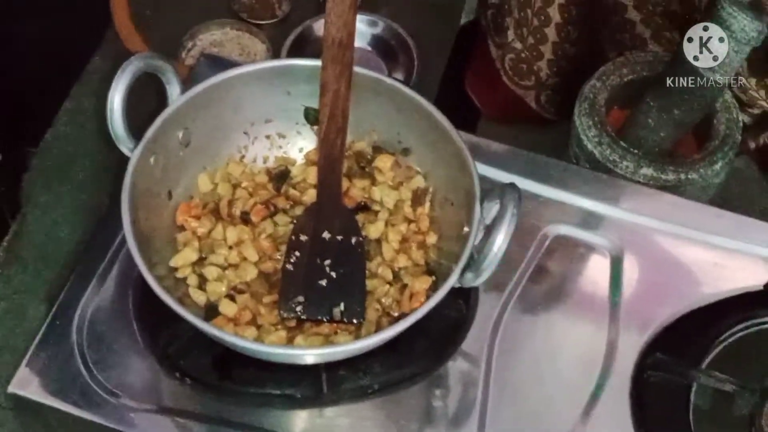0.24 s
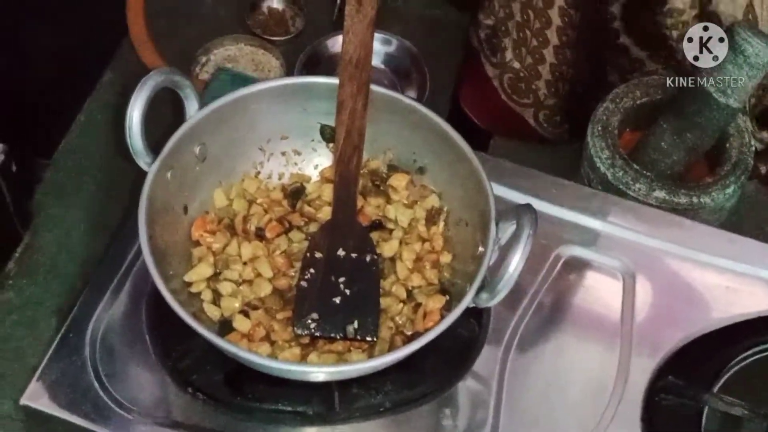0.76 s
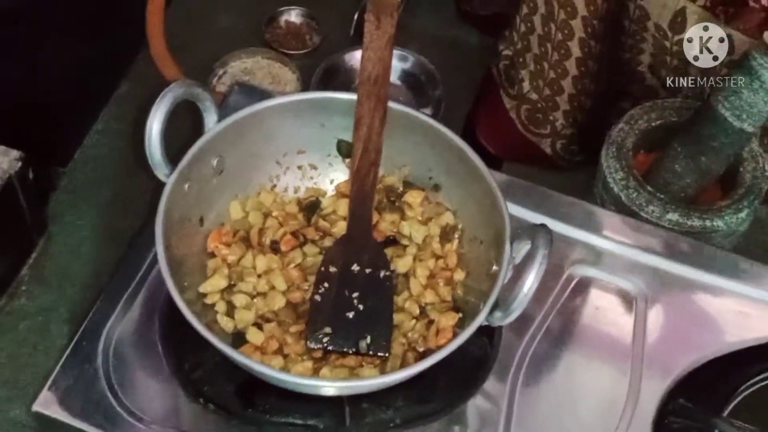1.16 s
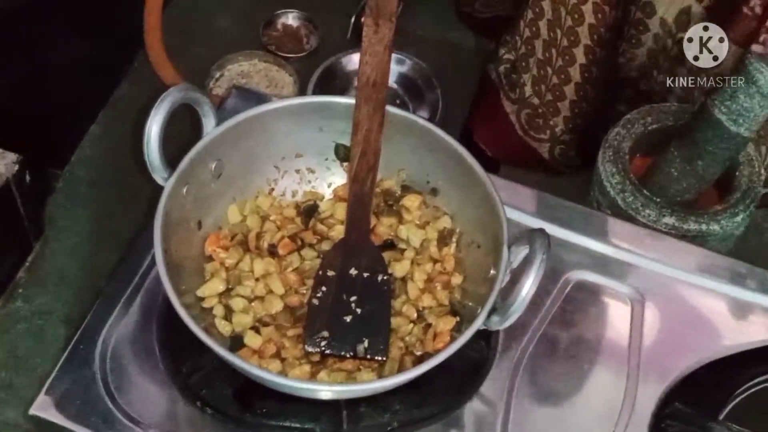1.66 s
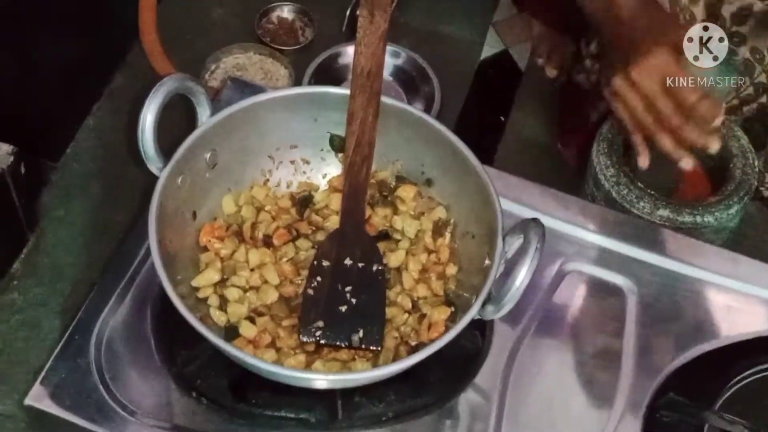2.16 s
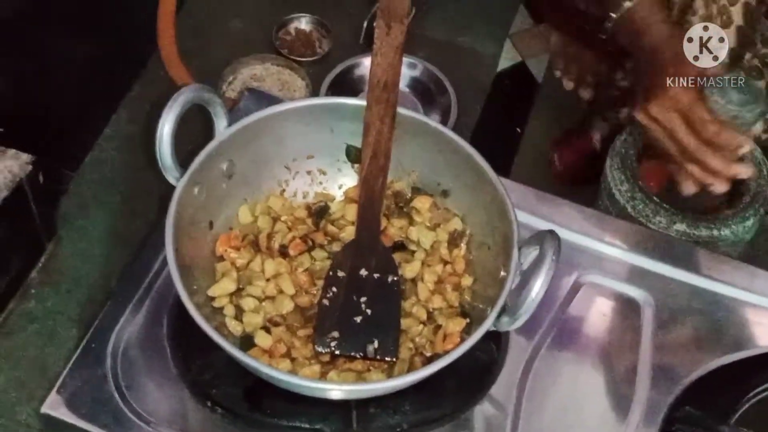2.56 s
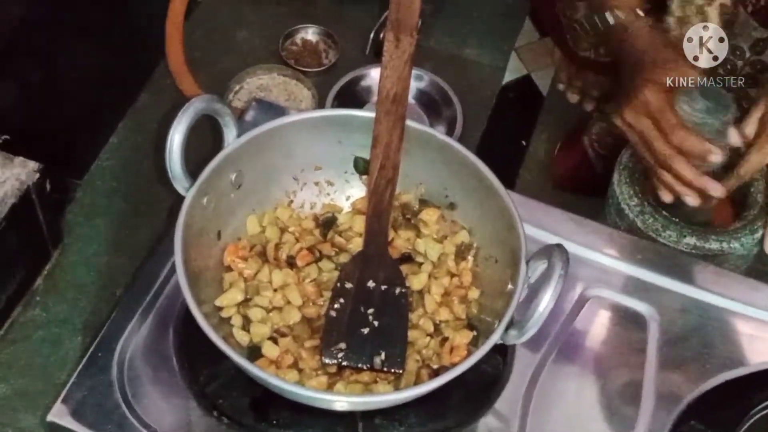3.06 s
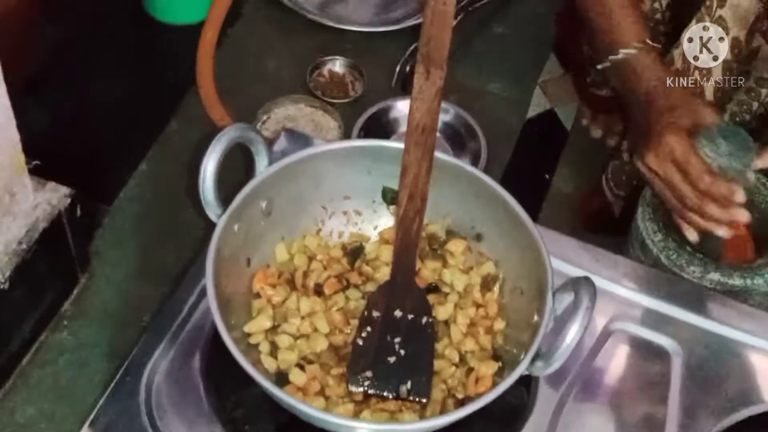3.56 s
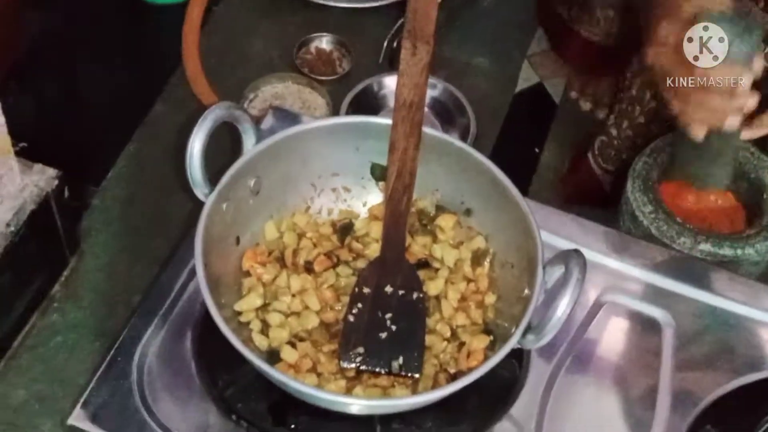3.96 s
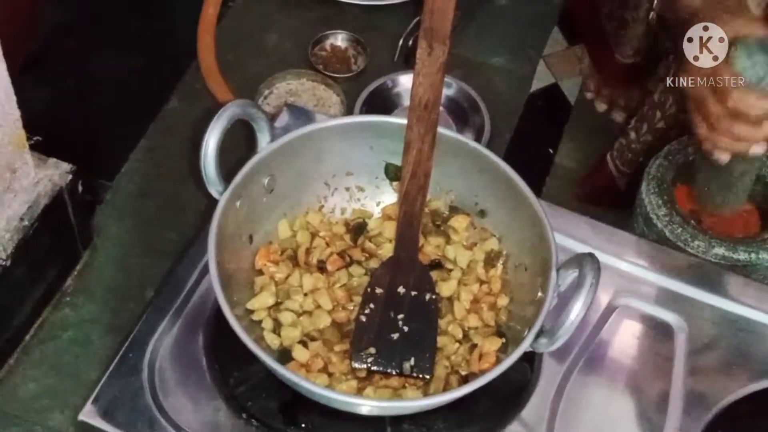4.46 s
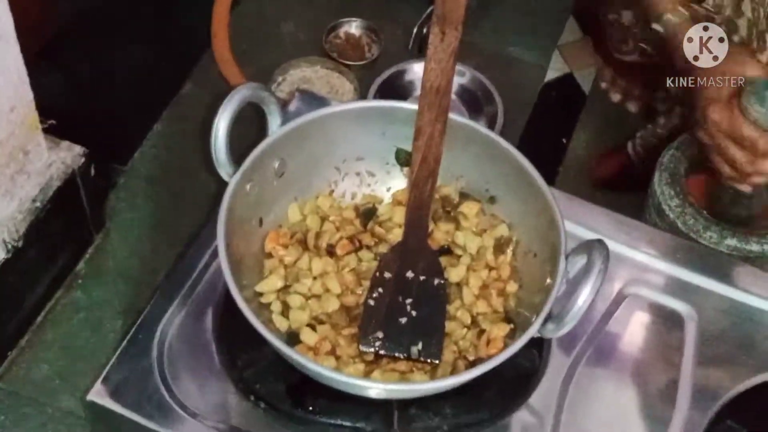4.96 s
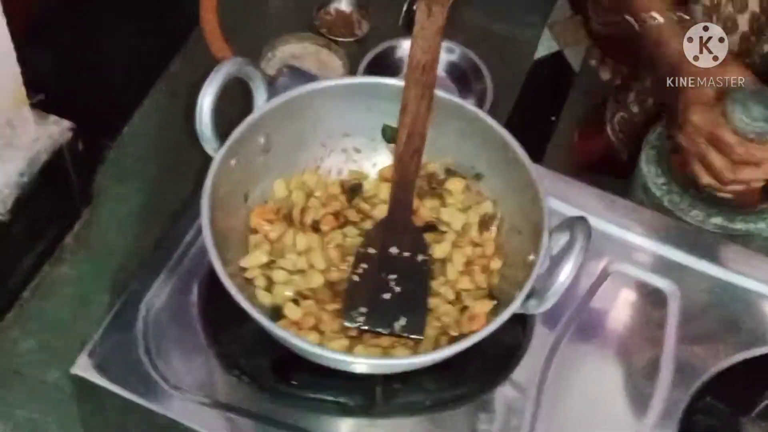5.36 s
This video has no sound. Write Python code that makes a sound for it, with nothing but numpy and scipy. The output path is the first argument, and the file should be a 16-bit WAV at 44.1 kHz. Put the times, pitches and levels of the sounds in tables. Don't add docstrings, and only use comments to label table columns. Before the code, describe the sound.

In a small hard kitchen, a stone pestle pounds in a stone mortar a little away from the microphone. A small knock and a hollow bowl tap come first, then double and triple blows, one very loud strike, and another firm cluster. A nearby pan sizzles softly over low rumble and mains hum; the background dips briefly after the hardest blow.

```python
import sys
import numpy as np
from scipy import signal
from scipy.fft import rfft, irfft, next_fast_len
from scipy.io import wavfile

SR = 44100
rng = np.random.default_rng(int(sys.argv[2]) if len(sys.argv) > 2 else 0)


def natural_amplitude(level_db):
    exponent = np.asarray(level_db, float) / 20
    return 10 ** exponent


def store_wav(level_fs):
    pcm = np.round(np.clip(np.atleast_2d(level_fs), -1, 1) * 32767)
    wavfile.write(sys.argv[1], SR, pcm.T.astype(np.int16))


N = 247652
SIZE = next_fast_len(N + SR)


def pestle():
    # t/s, thud/dB under 450 Hz, body/dB, clack/dB over 1400 Hz, echoes/dB
    blows = [(.103, -24.5, -32.5, -31, -31), (0.125, -42, -36, -72, -30), (.856, -58, -66, -40.5, -26),
             (1.138, -33, -27.5, -32, -22.5), (1.256, -46, -35.5, -44, -22), (1.867, -56, -40, -45, -24.5),
             (2.032, -25.5, -16, -14, -29.5), (2.0491, -22.5, -19, -15.5, -32.5),
             (2.336, -31, -16, -27, -24), (2.342, -25.5, -20.5, -23, -19.5), (2.35, -21, -17.5, -41, -24.5),
             (2.641, -43.5, -43, -38.5, -30), (2.904, -26.5, -22, -33.5, -26.5),
             (2.915, -31, -20.5, -31.5, -25.5), (3.968, -44.5, -64, -64, -27), (4.0664, 1, 2, -3, -29),
             (4.309, -52, -39, -47, -17.5), (4.426, -16.5, -11.5, -4.5, -29.5),
             (4.437, -29, -10.5, -42, -32.5), (4.488, -15.5, -9.5, -27, -29.5),
             (4.729, -25, -18.5, -29, -29), (4.905, -38, -54, -38, -21.5), (5.205, -49, -59, -32.5, -36.5),
             (5.499, -40, -28, -42, -22.5)]
    # f/Hz, level/dB, t60/s
    counter_modes = [(283, 14, 0.1), (397, -23, 0.27), (470.3, 4.5, 0.13), (567, -11, 0.11),
                     (650.3, 1.5, 0.34), (717.6, -3.5, 0.12), (837.5, 3.5, 0.12), (1045, -2, 0.75),
                     (1080, -11.5, 0.9), (1460, -3, 0.32), (1640, -4, 0.43)]
    s, thud_db, body_db, clack_db, echo_db = np.transpose(blows)
    cushion_db = 0.29 * np.clip(body_db + 45, -60, 25.0)
    click_db = clack_db - 14 - cushion_db
    shares_db = np.array([thud_db, body_db, clack_db, click_db])
    sent_db = shares_db + echo_db
    echoes = sum(room(contact(s[spot::3], sent_db[:, spot::3])) for spot in range(3))
    ringing = 0
    for hz, level_db, t60 in counter_modes:
        column = np.searchsorted([450, 1400], hz)
        luck_db = 2.7 * rng.standard_normal(len(s))
        train = clicks(s + .002, sent_db[column] + level_db + 12 + luck_db)
        ringing = ringing + ring(train, hz, min(t60, .33))
    return contact(s, shares_db) + echoes + soft(ringing)


def contact(seconds, shares_db):
    # f/Hz, t60/s
    contact_modes = [
        [(280, 0.022), (430, 0.014)],
        [(640, 0.011), (920, .014), (1300, 0.0042)],
        [(1680, 0.0042), (2350, 0.006)],
        [(2850, 0.011), (3250, 0.0048)],
    ]
    # lower edge/Hz, upper edge/Hz
    share_bands = [
        (215, 1770),
        (400, 3006),
        (900, 2710),
        (1900, 3800),
    ]
    out = 0
    for share_db, modes, (low_hz, top_hz) in zip(shares_db, contact_modes, share_bands):
        train = clicks(seconds, share_db + 3.0)
        pulse = sum((-1) ** k * ring(train, hz, t60) for k, (hz, t60) in enumerate(modes))
        pulse = signal.sosfilt(signal.butter(2, low_hz, "high", fs=SR, output="sos"), pulse)
        out = out + signal.sosfilt(signal.cheby1(5, 1, top_hz, fs=SR, output="sos"), pulse)
    return out


def mortar_rocking():
    # t/s, level/dB
    thumps = [
        (.104, -34.5),
        (.128, -39),
        (2.47, -45),
        (4.93, -45.5),
    ]
    # f/Hz, level/dB, t60/s
    base_modes = [(201, -1, 0.14), (370, -6.5, 0.095)]
    return soft(struck(thumps, base_modes))


def bowl():
    # t/s, level/dB
    bowl_taps = [
        (1.137, -25.5),
        (1.253, -38.5),
    ]
    # f/Hz, level/dB, t60/s
    bowl_modes = [(585, 8, .06), (562, -9, .3), (597, -5, .35), (646, -11, .3), (705, -7, .12),
                  (775, -12, .2), (1380, -11, .15), (1450, -12, .15), (115, -14, .25)]
    direct = soft(struck(bowl_taps, bowl_modes))
    return direct + natural_amplitude(-31) * room(direct)


def dish():
    # t/s, level/dB
    pings = [
        (2.914, -55),
        (4.078, -59.5),
        (4.43, -72),
        (4.74, -61),
        (4.78, -54),
    ]
    # f/Hz, level/dB, t60/s
    dish_modes = [(5750, 0.5, 0.24), (7040, -8, 0.18)]
    return struck(pings, dish_modes)


def boom():
    # t/s, level/dB
    floor_blows = [
        (1.139, -65),
        (2.337, -56),
        (4.07, -46),
        (4.489, -46.5),
        (4.75, -65),
    ]
    train = clicks(*np.transpose(floor_blows))
    return ring(train, 67.1, 0.78) - ring(train, 72.36, 1.0)


def spits():
    # t/s, level/dB, f/Hz
    fat_spits = [
        (1.2, -34, 14000),
        (5.206, -34, 4600),
        (5.209, -45, 2500),
    ]
    return sum(ring(clicks([at], [db]), hz, 0.0032) for at, db, hz in fat_spits)


def frying():
    # t/s, level/dB
    heat = [(0, -55), (.07, -56.5), (.25, -49.5), (.3, -57), (1.05, -56.5), (1.2, -53), (1.3, -56),
            (2.0, -56.5), (2.04, -53), (2.3, -57), (2.34, -54), (2.5, -55), (3.3, -57), (4.3, -55),
            (4.84, -52.5), (5.0, -58), (5.24, -53.5), (5.62, -54)]
    # f/Hz, density/dB per Hz
    sizzle_spectrum = [(1940, -67), (3300, -5.5), (3680, -9), (4010, -6.5), (4420, -9.5), (5300, -6.5),
                       (5910, -14), (6600, -19), (8440, 0.5), (9730, -8), (11200, -16), (12100, -22.5),
                       (13900, -12), (14900, -6), (15500, -25)]
    murmur_spectrum = [(410, -27), (700, -29), (715, -12.5), (1160, -0.5), (1530, 1), (2300, 3.5),
                       (2780, 0), (2990, -4.5), (4000, -19), (5200, -76), (8800, -120)]
    sizzle_db = np.interp(np.arange(N) / SR, *np.transpose(heat))
    murmur_db = -53 + 0.79 * (sizzle_db - sizzle_db.mean())
    murmur = natural_amplitude(murmur_db) * coloured(murmur_spectrum, patchy_db=1.44, grain_db=4.0, count=10)
    sizzle = natural_amplitude(sizzle_db) * coloured(sizzle_spectrum, patchy_db=2.0, grain_db=5.0, count=14)
    return murmur + sizzle


def rumble():
    # f/Hz, density/dB per Hz
    rumble_spectrum = [(15, -74), (25, -23), (59, -11.5), (134, -3.5), (172, -6.5), (189, 0), (220, -7.5),
                       (245, -5), (455, -7), (477, -10), (565, -6.5), (712, -8), (1000, -16.5), (1300, -34),
                       (2200, -120)]
    # t/s, level/dB above the rumble, rise and fall/s
    swells = [
        (0, 2.5, 0.25),
        (1.9, 0.5, .4),
        (2.7, 3, 0.57),
        (3.45, 6, 0.14),
        (4.3, 9.5, 0.48),
        (5.1, 4, 0.28),
        (5.62, 8.5, 0.24),
    ]
    t = np.arange(N) / SR
    swell_db = sum(db * np.clip(1 - abs(t - at) / span, 0, 1) for at, db, span in swells)
    return natural_amplitude(-59 + swell_db) * coloured(rumble_spectrum, patchy_db=1.5, grain_db=2.5)


def hum():
    # f/Hz, level/dB rms
    harmonics = [(199.2, -64.5), (248.5, -64.5), (291, -74.5)]
    t = np.arange(N) / SR
    return sum(np.sqrt(2) * natural_amplitude(db + 0.73 * drift(1.2)) * np.sin(2 * np.pi * hz * t) for hz, db in harmonics)


def room(x):
    # f/Hz, t60/s
    decay_times = [(100, 1), (260, 0.48), (700, 0.41), (1840, 0.47)]
    # f/Hz, level/dB
    echo_colour = [(100, -10), (200, -3), (400, 0), (3000, 0), (5000, -6)]
    t, tail = np.arange(SR) / SR, 0
    white = rng.standard_normal((2, SR))
    for k, hz in enumerate(100 * 2 ** np.arange(0, 6, .5)):
        sos = signal.butter(2, [hz / 2 ** .25, hz * 2 ** .25], "band", fs=SR, output="sos")
        decay_db = at_hz(echo_colour, hz) - 60 * t / at_hz(decay_times, hz)
        tail = tail + signal.sosfilt(sos, white[k % 2]) * natural_amplitude(decay_db)
    tail = tail * (t > .003)
    return irfft(rfft(x, SIZE) * rfft(tail, SIZE), SIZE)[:N]


def clicks(seconds, db):
    out = np.full(N, 1e-18)
    np.add.at(out, np.round(np.array(seconds) * SR).astype(int), natural_amplitude(np.array(db)))
    return out


def ring(x, hz, t60):
    r, w = natural_amplitude(-60 / (t60 * SR)), 2 * np.pi * hz / SR
    return signal.lfilter([0, np.sin(w)], [1, -2 * r * np.cos(w), r * r], x)


def struck(taps, modes):
    train = clicks(*np.transpose(taps))
    return sum(natural_amplitude(db) * ring(train, hz, t60) for hz, db, t60 in modes)


def soft(x):
    return signal.sosfilt(signal.butter(3, [80, 2300], "band", fs=SR, output="sos"), x)


def coloured(spectrum, patchy_db, grain_db, count=6):
    grain_height = natural_amplitude(grain_db * np.minimum(rng.exponential(1, N), 3.0))
    bursts = grain_height * (rng.random(N) < 400 / SR)
    white = rng.standard_normal(N) * (1 + bursts)
    hz = np.fft.rfftfreq(SIZE, 1 / SR)
    low, high = spectrum[0][0], spectrum[-1][0]
    shaped = rfft(white, SIZE) * natural_amplitude(at_hz(spectrum, hz)) * (hz > low) * (hz < high)
    place = (np.sqrt(hz) - np.sqrt(low)) / (np.sqrt(high) - np.sqrt(low)) * (count - 1)
    out, together = 0, drift(6.2)
    for k in range(count):
        band = irfft(shaped * np.clip(1 - abs(place - k), 0, 1), SIZE)[:N]
        out = out + band * natural_amplitude(patchy_db * (0.77 * together + drift(25)))
    return rms_one(out)


def drift(rate):
    r = np.exp(-80 * np.pi * rate / SR)
    white = rng.standard_normal(N // 40 + 2002)
    slow = signal.lfilter([1], [1, -2 * r, r * r], white)[2000:]
    return np.interp(np.arange(N) / 40, np.arange(len(slow)), rms_one(slow))


def rms_one(x):
    return x / np.sqrt(np.mean(x ** 2) + 1e-20)


def at_hz(points, hz):
    table_hz, values = np.array(points).T
    return np.interp(np.log(hz + 1), np.log(table_hz), values)


def duck(depth_db):
    attack_s, hold_s, release_s = 0.012, 0.05, 0.21
    turns = 4.03 + np.cumsum([0, attack_s, hold_s, release_s])
    return natural_amplitude(depth_db * np.interp(np.arange(N) / SR, turns, [0, 1, 1, 0]))


def scene():
    knocks = signal.sosfilt(signal.butter(3, 190, "high", fs=SR, output="sos"), pestle()) * duck(-5.5)
    background = duck(-9) * (rumble() + hum() + frying())
    return (knocks + mortar_rocking() + bowl() + dish() + boom() + spits() + background)[None]


def roll_off(x):
    return signal.sosfilt(signal.butter(12, 15920, fs=SR, output="sos"), x)


def record(dry):
    rounded = 2.51 * np.tanh(dry / 2.39)
    mix = signal.sosfilt(signal.cheby2(12, 60, 15820, fs=SR, output="sos"), rounded)
    return roll_off(mix)


dry = scene()
out = record(dry)
store_wav(out)
```